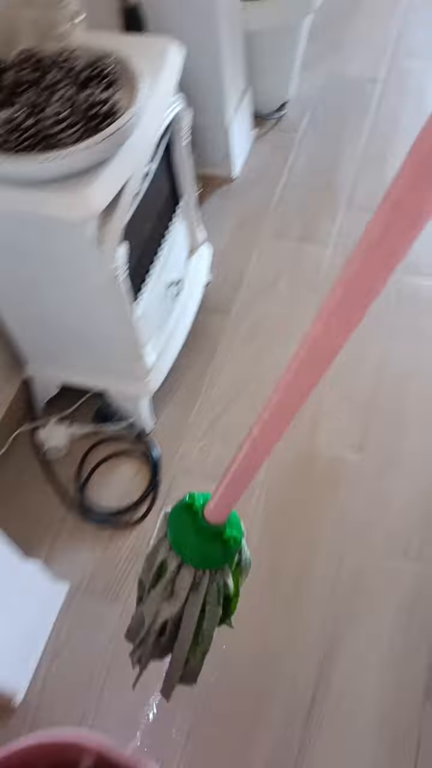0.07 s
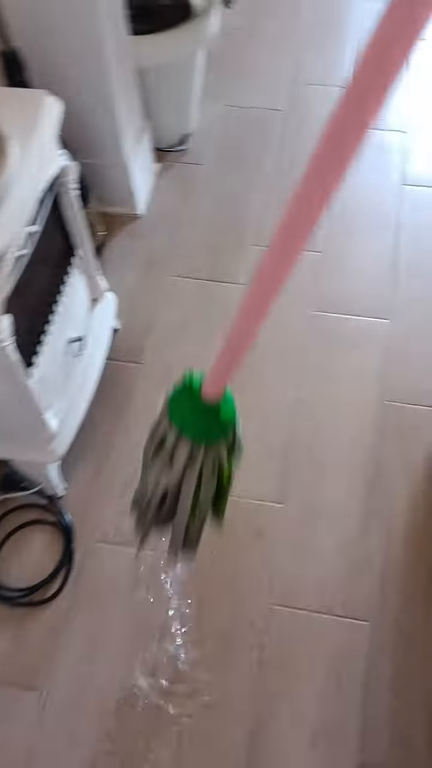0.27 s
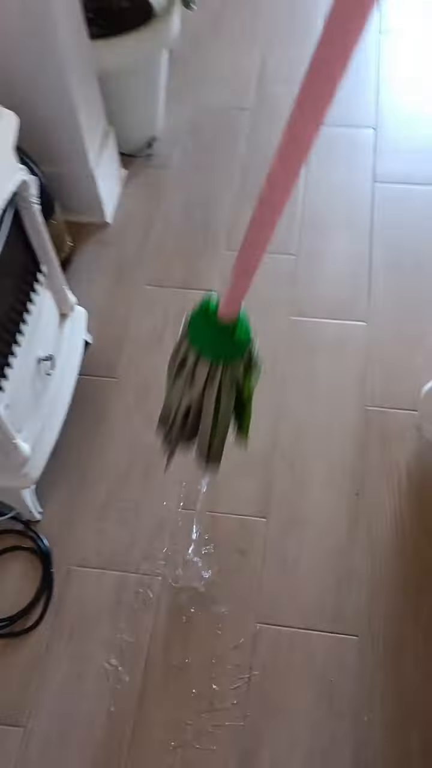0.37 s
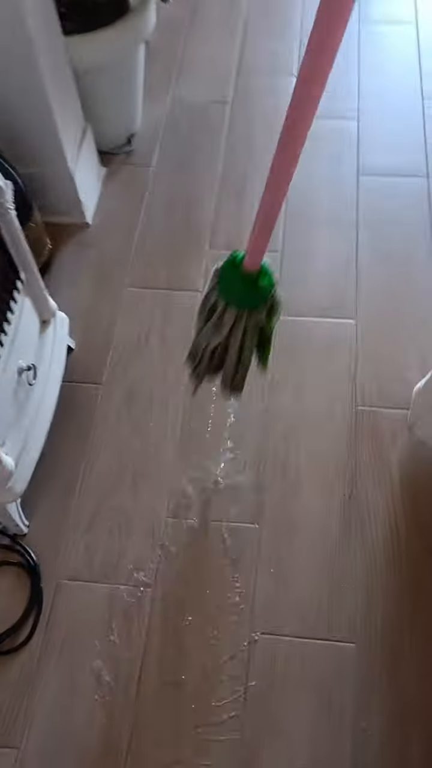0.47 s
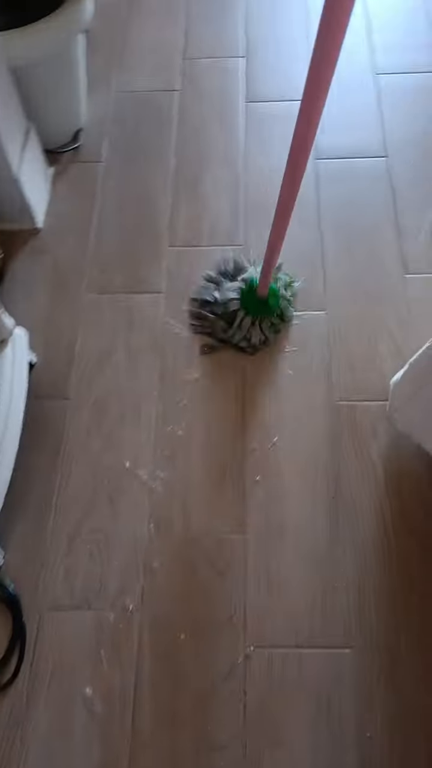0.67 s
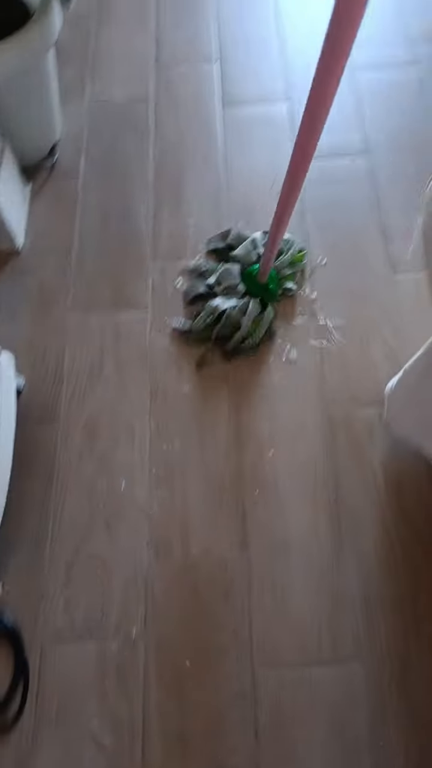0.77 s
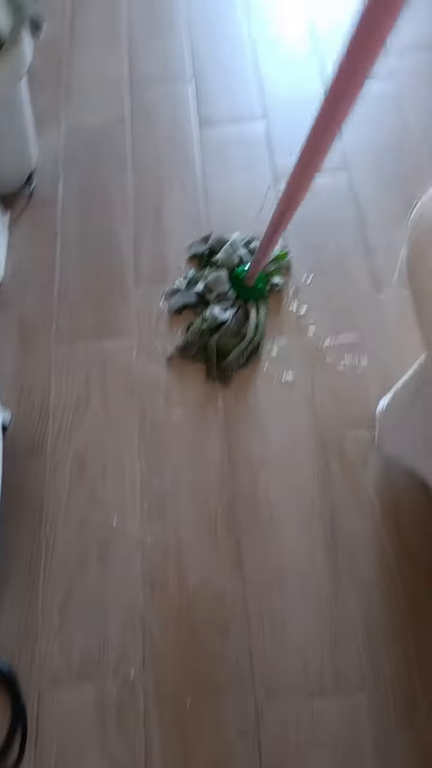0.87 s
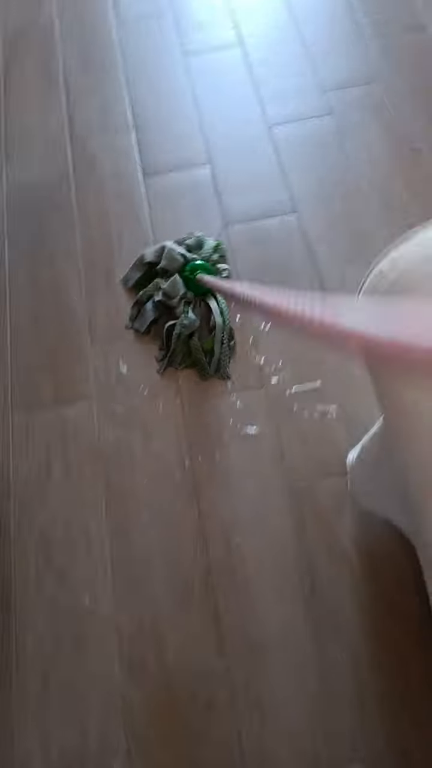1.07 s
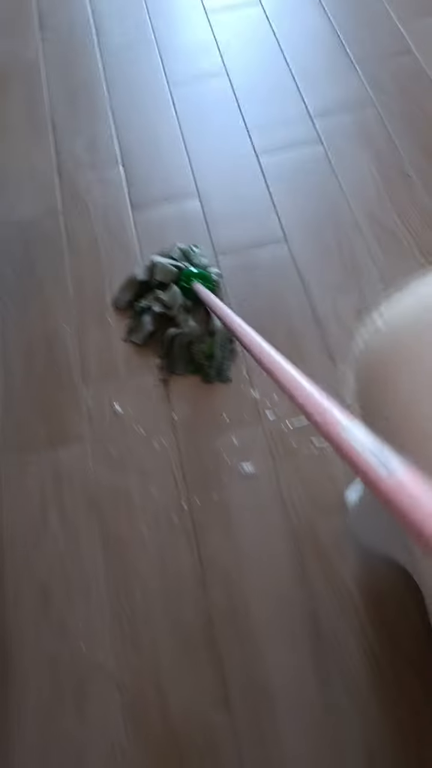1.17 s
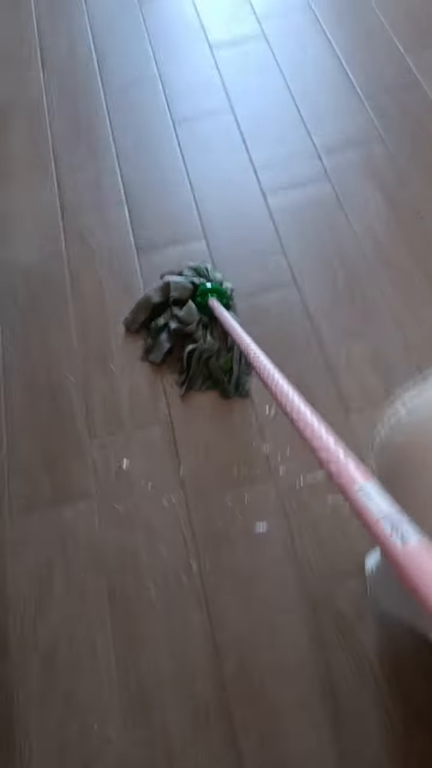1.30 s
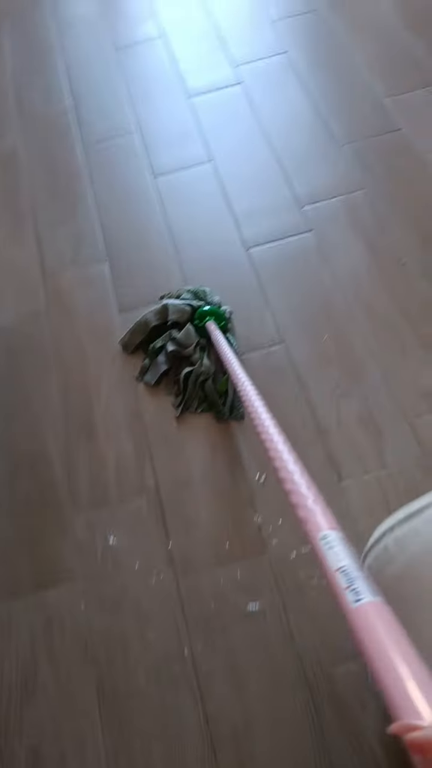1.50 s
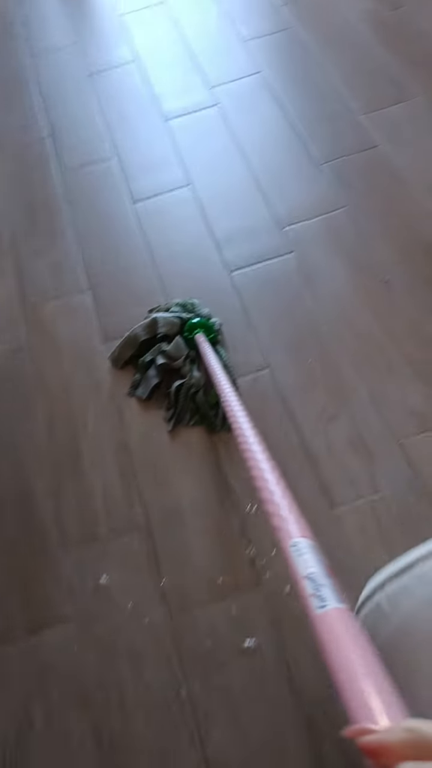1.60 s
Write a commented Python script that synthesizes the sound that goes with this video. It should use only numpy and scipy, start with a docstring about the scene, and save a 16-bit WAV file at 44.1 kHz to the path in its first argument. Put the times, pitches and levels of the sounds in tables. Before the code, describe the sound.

A soaked mop drips with small plinks from the start, and water spatters on tiles from about 0.2 to 0.6 seconds. The head then lands with a wet slap. Just before 1 second the handle clicks sharply in its socket, among tiny ticks. A faint swish follows around 1.4 seconds as the mop slides. The small room echoes, with a quiet hum and low rumble underneath.

```python
"""Wet mop on tiles

A soaked string mop swings out of its bucket: drops plink and a stream of water spatters on the tiles.
The head lands with a wet slap, its strands flopping down in waves and squeezing out pockets of air.
The handle tips over and knocks in its socket, and a faint swish follows as the mop is drawn along.
The small, hard room echoes and hums quietly."""
import sys
import numpy as np
from scipy import signal
from scipy.fft import rfft, irfft, next_fast_len
from scipy.io import wavfile
from scipy.ndimage import uniform_filter1d

SR = 44100
rng = np.random.default_rng(int(sys.argv[2]) if len(sys.argv) > 2 else 0)


def dump_mix(stems):
    """Bounce the given channels to the path in sys.argv[1] as a 16-bit WAV at rate SR."""
    frames = np.atleast_2d(stems).T  # one column per channel
    limited = np.clip(frames, -1, 1)  # hard clip at full scale
    pcm = np.round(limited * 32767).astype(np.int16)
    wavfile.write(sys.argv[1], SR, pcm)


N = 72765
T = np.arange(N) / SR


# waves of strands hitting the floor: t/s, thud level/dB, splash level/dB, spray level/dB, decay/s
STRAND_WAVES = [(.6095, -51, -43, -34.5, 0.013), (0.6201, -34.5, -19.5, -24, 0.01),
                (0.635, -31, -22.5, -37, 0.018), (0.6481, -38.5, -25, -31, 0.0072),
                (0.664, -39, -32.5, -33, 0.011), (.680, -54, -29.5, -27, 0.015),
                (0.694, -28.5, -23.5, -53, 0.0052), (.710, -43, -29, -39, 0.0082),
                (0.732, -55.5, -40, -62, 0.038)]
# tone of the low thud, the middle splash and the high spray: f/Hz, level/dB
THUD_TONE = [(40, -5), (150, -25), (280, 4), (500, -4), (750, -2), (1250, -1.5), (2000, 3), (5000, -55)]
SPLASH_TONE = [(100, -30), (800, -23.5), (1500, -10.5), (2500, 2), (3200, 0.5), (4200, -4), (6200, -5),
               (8000, -21.5), (16000, -25.5)]
SPRAY_TONE = [(500, -50), (3000, 0), (6000, 0), (9000, 1.5), (12000, -2), (16000, -1)]
# air pockets under the strands: t/s, f/Hz, level/dB, time to fade by 60 dB/s
AIR_POCKETS = [(.627, 1250, -29, .07), (.634, 1140, -31, .05), (.645, 755, -25, .042),
               (.671, 770, -32, .03)]

def slap():
    """Each wave of strands lands as many tiny wet hits; trapped air rings underneath."""
    thud = unit(colour(crackle(per_s=9000, spread_db=0.5), THUD_TONE))
    splash = unit(colour(crackle(per_s=14000, spread_db=2), SPLASH_TONE))
    spray = unit(colour(crackle(per_s=8800, spread_db=4.5), SPRAY_TONE))
    out = np.zeros(N)
    for start, thud_db, splash_db, spray_db, decay in STRAND_WAVES:
        hits = amp(thud_db) * thud + amp(splash_db) * splash + amp(spray_db) * spray
        out += burst(start, decay) * hits
    return out + sum(amp(db) * ring(start, hz, fade) for start, hz, db, fade in AIR_POCKETS)


# how strongly the water falls: t/s, level/dB
WATER_FLOW = [(.1, -68), (.228, -84), (.242, -33.5), (.3, -42), (.335, -41.5), (.38, -37.5), (.44, -40),
              (.486, -48), (.535, -59), (.57, -58), (.61, -60), (.64, -75.5)]
# tone of the fine droplets: f/Hz, level/dB
DROPLET_TONE = [(100, -43), (1500, -17.5), (2300, -10), (3300, -5), (6000, 2.5), (9000, -5), (16000, 1)]
# blobs of water hitting the tiles: t/s, level/dB, centre f/Hz, decay/s
BLOBS = [(.004, -45, 3020, 0.06), (.05, -41.5, 2800, 0.011), (0.118, -30, 4930, 0.0023),
         (0.235, -38, 7050, 0.0058), (0.2443, -33, 7400, 0.0067), (0.277, -32, 6000, .004),
         (0.29, -31, 5500, 0.0042), (0.307, -31.5, 7100, 0.0048), (.346, -30, 7200, 0.0032),
         (.353, -28, 7900, 0.0018), (.372, -33.5, 7640, 0.011), (0.393, -31.5, 6000, 0.0044),
         (0.411, -30.5, 5600, 0.0026), (0.434, -31.5, 7800, 0.0027), (.452, -31, 5120, 0.0047),
         (.4925, -36, 4170, 0.0072), (0.505, -41, 7540, 0.0073), (.512, -28, 4160, 0.004),
         (.545, -37, 11300, 0.0028), (.565, -45.5, 12000, 0.016), (.582, -48, 12000, 0.024),
         (0.599, -45, 12800, 0.014)]

def stream():
    """Fine droplets patter on the tiles with the flow; bigger blobs splat among them."""
    out = curve(WATER_FLOW) * unit(colour(crackle(per_s=1300, spread_db=1.5), DROPLET_TONE))
    fizz = crackle(per_s=14000, spread_db=2)
    hiss = crackle(per_s=9000, spread_db=1.5)
    for start, db, hz, decay in BLOBS:
        splat = unit(band(fizz, hz, width=0.84) + 0.14 * hiss)
        out += amp(db) * burst(start, decay) * splat
    return out


# drops that trap a bubble: t/s, first f/Hz, last f/Hz, length/s, level/dB
BUBBLES = [(.0025, 2720, 3330, .012, -28), (.1985, 1980, 7330, 0.0077, -22.5),
           (0.2723, 2290, 5770, 0.0066, -28.5), (0.287, 5720, 6120, 0.0055, -24),
           (0.3485, 2040, 6530, 0.0062, -21.5), (0.4513, 3930, 5950, 0.0052, -29.5),
           (.456, 4900, 4090, 0.0064, -27), (1.053, 5100, 6600, 0.0023, -40),
           (1.063, 5160, 6550, 0.0021, -42)]

def plinks():
    """Each drop's bubble sings a tiny note that swells and dies, most often sliding upward."""
    out = np.zeros(N)
    for start, from_hz, to_hz, length, db in BUBBLES:
        progress = np.clip((T - start) / length, 0, 1)
        hz = from_hz * (to_hz / from_hz) ** progress * (progress > 0)
        swell = np.sin(np.pi * progress) ** 2
        out += amp(db) * swell * np.sin(2 * np.pi * np.cumsum(hz) / SR)
    return out


# knocks in the socket: t/s, click level/dB, ring level/dB, click decay/s
HANDLE_KNOCKS = [(.9558, -12, -37, .0006), (.9605, -27, -39, .004)]
# tone of the click: f/Hz, level/dB
CLICK_TONE = [(200, -10), (1000, -12.5), (1800, 3.5), (3000, 9.5), (4000, -0.5), (5800, 6), (9000, -3),
              (16000, -23)]
# notes of the tube: f/Hz, level/dB added to the ring level, time to fade by 60 dB/s
TUBE_NOTES = [(1440, -11, .07), (1860, -5, .06), (2730, -1, .12), (2985, 7, .035), (3190, -3, .045),
              (4760, -4, .03), (5860, -13, .08), (6020, -12, .07)]

def handle():
    """The tipping handle clicks in its socket and its tube rings."""
    click = unit(colour(rng.standard_normal(N), CLICK_TONE))
    out = np.zeros(N)
    for start, click_db, ring_db, decay in HANDLE_KNOCKS:
        tube = sum(amp(db) * ring(start, hz, fade) for hz, db, fade in TUBE_NOTES)
        out += amp(click_db) * burst(start, decay) * click + amp(ring_db) * tube
    return out


# tiny bright ticks and creaks: t/s, level/dB, centre f/Hz
BRIGHT_TICKS = [(.1055, -44, 11200), (.221, -33, 10600), (0.4917, -25, 12000), (.84, -45, 14000),
                (0.853, -45, 13000), (0.9079, -33, 11000), (0.923, -38, 12200), (0.927, -26.5, 13400),
                (0.9427, -35, 6600), (.948, -20.5, 11000), (0.953, -21.5, 13500), (0.975, -48, 12000),
                (.9862, -37, 12000), (1.011, -34.5, 9100), (1.026, -38, 11000), (1.034, -42, 12800),
                (1.122, -47, 12900), (1.137, -56, 11000), (1.17, -49.5, 13000), (1.218, -56, 12000),
                (1.2355, -38.5, 15100)]

def ticks():
    """Tiny bright ticks and creaks, perhaps from the plastic handle."""
    return sum(amp(db) * burst(start, decay_s=0.001) * unit(band(rng.standard_normal(N), hz, width=0.95))
               for start, db, hz in BRIGHT_TICKS)


# loudness of the swish: t/s, level/dB
SWISH_LEVEL = [(1.18, -75), (1.27, -60.5), (1.33, -50.5), (1.36, -53), (1.42, -48), (1.48, -51.5),
               (1.55, -61.5), (1.65, -89)]
# whistles in the swish: f/Hz at the middle of the slide, width/Hz, level/dB
SWISH_WHISTLES = [(2453, 150, -1.5), (2650, 82, 1), (2800, 100, 2.5), (3130, 170, -2), (2800, 920, -9)]

def swish():
    """As the mop is drawn along, a few faint, breathy whistles rise slowly in pitch."""
    middle_s, rise_per_s = 1.42, 0.33
    glide = np.cumsum(1 + rise_per_s * (T - middle_s)) / SR
    out = np.zeros(N)
    for hz, width, db in SWISH_WHISTLES:
        # slow noise blurs a pure note into a narrow hiss
        smoothing = signal.butter(2, width / 2, fs=SR, output="sos")
        wobble = signal.sosfilt(smoothing, rng.standard_normal((2, 2, N)))
        phase = 2 * np.pi * hz * glide
        out = out + amp(db) * unit(wobble[0] * np.cos(phase) + wobble[1] * np.sin(phase))
    return curve(SWISH_LEVEL) * unit(out)


# tone of the room's hum and of a low handling rumble: f/Hz, level/dB
HUM_TONE = [(25, -29), (60, -8), (110, -2.5), (170, -8.5), (225, 6), (290, -6.5), (500, -8.5),
            (1000, -11.5), (2000, -14.5), (3200, -16.5), (5500, -28.5), (7000, -32), (9000, -51),
            (16000, -42)]
RUMBLE_TONE = [(18, -29), (30, -7.5), (42, -1.5), (57, 0), (75, -5.5), (100, -19.5), (140, -10.5),
               (180, -25.5), (300, -21.5), (600, -29), (2000, -48.5)]
# loudness of the handling rumble: t/s, level/dB
RUMBLE_SWELLS = [(0, -49), (.15, -51), (.3, -55), (.44, -53.5), (.53, -49), (.66, -53), (.85, -51.5),
                 (1, -49), (1.09, -52.5), (1.125, -46), (1.16, -53), (1.3, -51.5), (1.65, -58.5)]

def background():
    """The room hums steadily, while a low handling rumble comes and goes."""
    hum = amp(-56.5) * unit(colour(diffuse(split_hz=970), HUM_TONE))
    rumble = curve(RUMBLE_SWELLS) * unit(colour(diffuse(split_hz=570), RUMBLE_TONE))
    return hum + rumble


# the room's echo, band by band: centre f/Hz, time to fade by 60 dB/s, level/dB
ECHO_BANDS = [(243, 0.8, -11), (648, 0.62, -5.5), (1483, 0.46, -3.5), (3000, 0.42, -6), (6000, 0.39, -10.5),
              (12000, 0.23, -11.5)]

def room(x, echo_db, place=0):
    """Sound arrives directly, then off nearby surfaces, then as a fading echo."""
    size = N // 3
    early = diffuse() * burst(0.0015, decay_s=0.016)
    echo = amp(-3.5) * unit(early[:, :size])
    noise = diffuse()
    for hz, fade, db in ECHO_BANDS:
        tail = noise * burst(0.0057, fade / np.log(1000))
        echo += amp(db) * band(unit(tail[:, :size]), hz, width=1)
    left_lag_s = 0.00017 + 0.00022 * place  # place runs from -1 to 1 across the wet patch
    direct = np.array([np.roll(x, round(left_lag_s * SR)), x])
    return direct + amp(echo_db) * signal.fftconvolve(x[None], echo / np.sqrt(size), axes=1)[:, :N]


def scattered(x, echo_db, spots, stay_s=0.0025):
    """The water lands now here, now there; each spot has its own path to the microphones."""
    spot = rng.integers(spots, size=N)[(T / stay_s).astype(int)]
    out = np.zeros((2, N))
    for k, place in enumerate(np.linspace(-1, 1, spots)):
        share = np.abs(uniform_filter1d((spot == k) * 1., size=40))  # soft hand-over between spots
        out += room(x * np.sqrt(share), echo_db, place)
    return out


def amp(db):
    """Turn decibels into a gain."""
    return 10 ** (np.asarray(db) / 20)


def unit(x):
    """Scale a sound to an average power of one."""
    return x / np.sqrt(np.mean(x ** 2))


def curve(points):
    """Gain over time through (t/s, level/dB) points."""
    return amp(np.interp(T, *np.array(points).T))


def colour(x, points):
    """Shape a sound's tone through (f/Hz, level/dB) points."""
    hz, db = np.array(points, float).T
    size = 2 * next_fast_len(N)
    log_hz = np.log(np.fft.rfftfreq(size, 1 / SR) + 1)
    gain = amp(np.interp(log_hz, np.log(hz), db))
    # fold the filter forward in time, so nothing rings before its hit
    cepstrum = irfft(np.log(gain))
    cepstrum[1:size // 2] *= 2
    cepstrum[size // 2 + 1:] = 0
    return irfft(rfft(x, size) * np.exp(rfft(cepstrum)))[..., :N]


def band(x, hz, width):
    """Keep the pitches around hz; width is a share of hz."""
    edges = [hz / (1 + width / 2), min(hz * (1 + width / 2), SR * .48)]
    return signal.sosfilt(signal.butter(2, edges, "band", fs=SR, output="sos"), x)


def crackle(per_s, spread_db):
    """Tiny hits of uneven size at random moments."""
    hits = (rng.random(N) < per_s / SR) * rng.choice([-1, 1], N)
    return hits * amp(spread_db * rng.standard_normal(N))


def burst(start, decay_s, rise_s=0.00048):
    """A quick rise, then a smooth fade."""
    age = np.maximum(T - start, 0)
    return (1 - np.exp(-age / rise_s)) * np.exp(-age / decay_s)


def ring(start, hz, fade_s):
    """A struck note that drops 60 dB in fade_s."""
    return burst(start, fade_s / np.log(1000)) * np.sin(2 * np.pi * hz * (T - start))


def diffuse(split_hz=650):
    """Noise from all round: left and right are alike in the bass, unrelated above."""
    mid, side = rng.standard_normal((2, N))
    side = signal.sosfilt(signal.butter(1, split_hz, "high", fs=SR, output="sos"), side)
    return np.array([mid + side, mid - side]) / np.sqrt(2)


def scene():
    """Water and mop sound together in the room."""
    water = scattered(plinks(), echo_db=1, spots=2) + scattered(stream(), echo_db=-0.5, spots=3)
    head = scattered(slap(), echo_db=2.5, spots=4)
    clicks = room(ticks(), echo_db=1) + room(handle(), echo_db=-3.5)
    return water + head + clicks + swish() + background()


# tone of the left and right microphones: f/Hz, level/dB
LEFT_TONE = [(200, 0), (1500, 2.5), (2500, 2), (5200, 2.5), (6900, 7.5), (8300, -25), (10000, 6),
             (12300, -3), (14300, 9), (15500, 6)]
RIGHT_TONE = [(200, 0), (1500, 1), (3000, -3), (5400, 0.5), (6800, -3), (8100, 7), (10000, 6), (12000, 4),
              (13800, -5), (15500, -21)]

def record(dry):
    """Each microphone colours the treble in its own way; the very top is cut."""
    top_hz = 15700
    stereo = np.array([colour(dry[0], LEFT_TONE), colour(dry[1], RIGHT_TONE)])
    return signal.sosfilt(signal.ellip(10, .2, 70, top_hz, fs=SR, output="sos"), stereo)


dry = scene()
out = record(dry)
dump_mix(out)
```